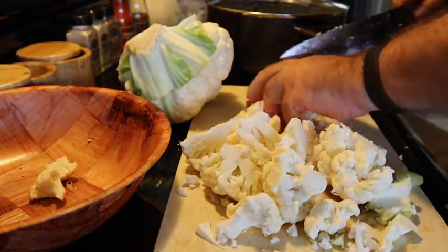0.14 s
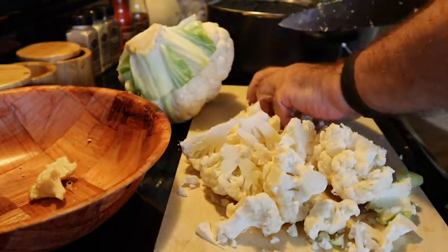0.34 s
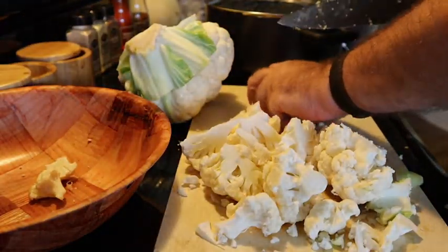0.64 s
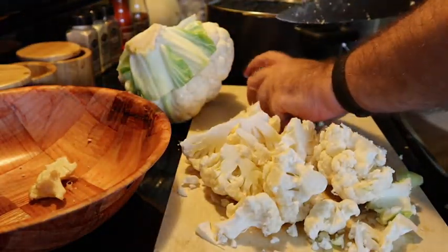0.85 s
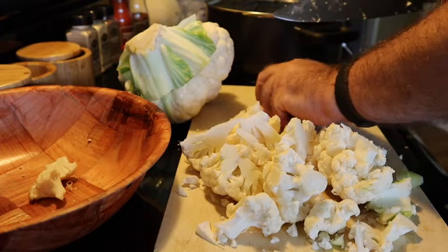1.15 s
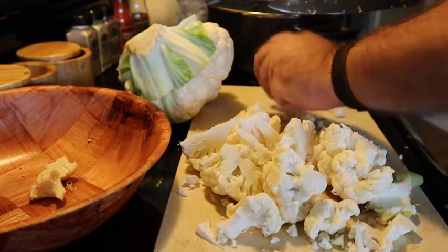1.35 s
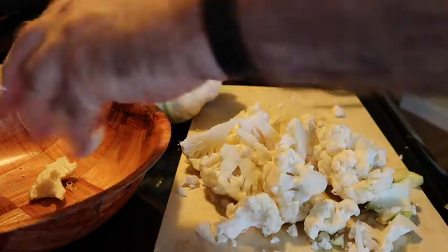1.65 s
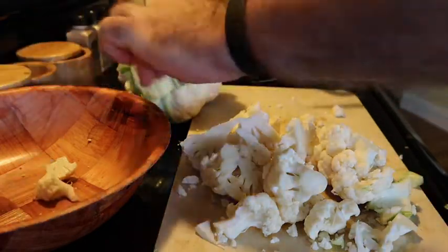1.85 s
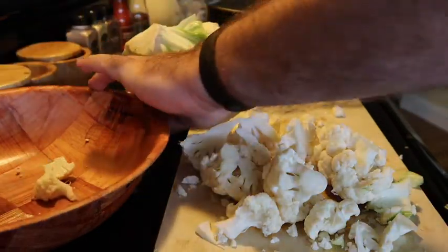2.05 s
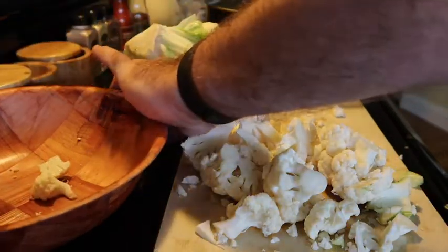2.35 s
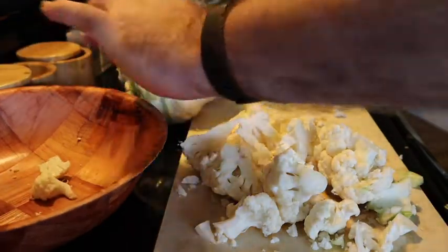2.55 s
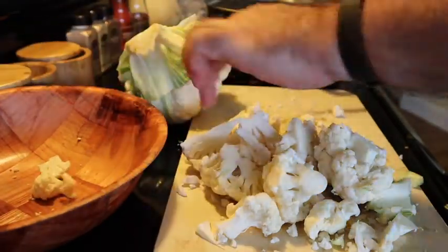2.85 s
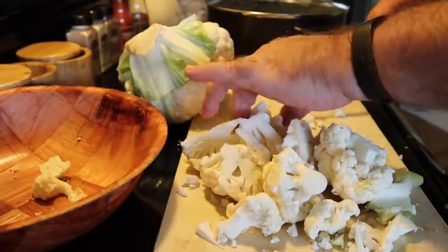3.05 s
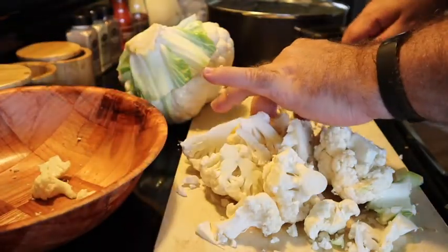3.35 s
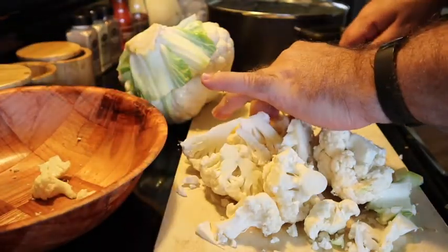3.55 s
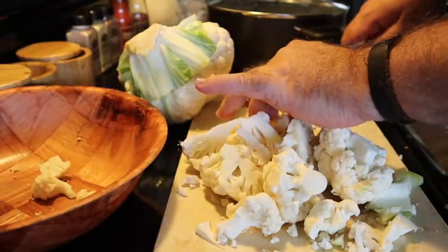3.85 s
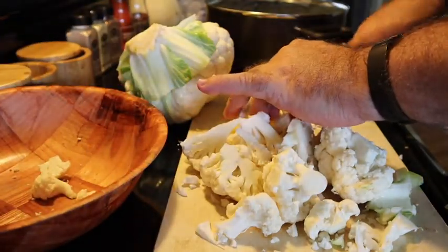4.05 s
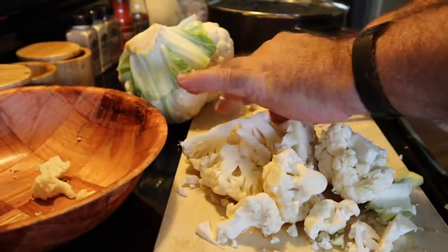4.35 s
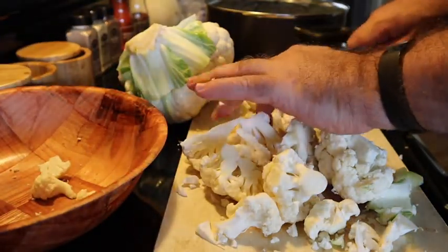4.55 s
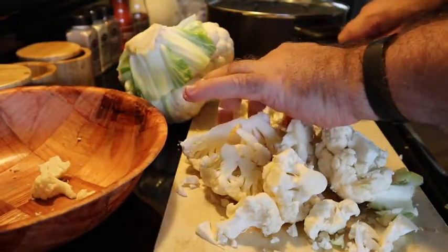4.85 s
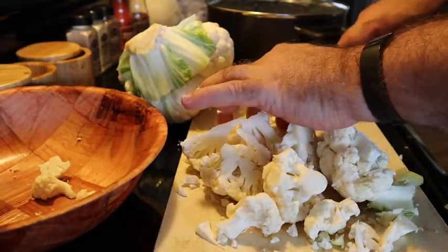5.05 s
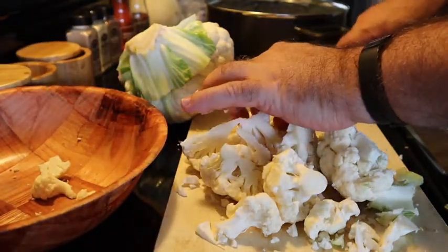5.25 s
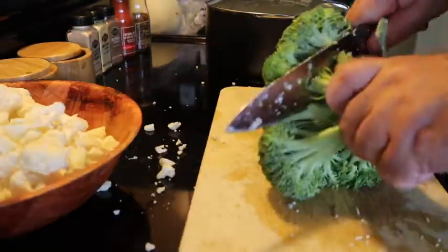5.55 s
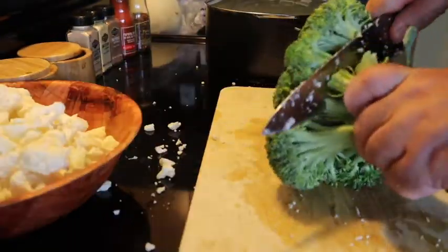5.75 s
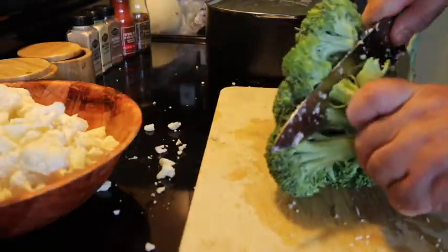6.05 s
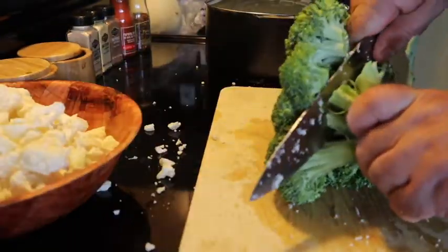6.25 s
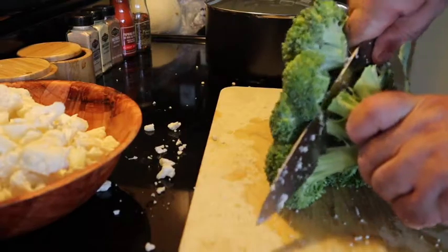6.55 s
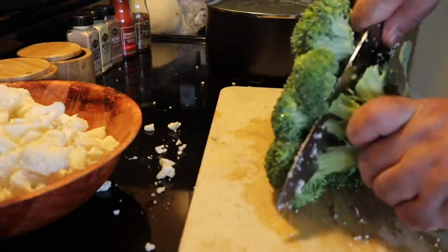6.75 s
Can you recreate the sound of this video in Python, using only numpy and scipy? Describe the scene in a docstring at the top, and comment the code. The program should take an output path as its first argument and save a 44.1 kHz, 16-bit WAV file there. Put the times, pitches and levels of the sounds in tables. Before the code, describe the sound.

Vegetable pieces rustle and bounce into a wooden bowl, a knife chops once loudly, then crunches through broccoli over a faint hum.

```python
"""An appliance hums in a kitchen while vegetables rustle and tap on a cutting board close by.
A cauliflower floret bounces in a wooden bowl, each impact exciting the damped modes of the wood.
A stalk fractures and the knife strikes the board with a loud crack. Then the blade crunches through
broccoli, whose bursting cells and snapping fibres radiate trains of tiny pulses. The small room
reverberates briefly."""
import sys
import numpy as np
from scipy import signal
from scipy.fft import rfft, irfft, next_fast_len
from scipy.io import wavfile
from scipy.ndimage import uniform_filter1d, map_coordinates

SR = 44100
rng = np.random.default_rng(int(sys.argv[2]) if len(sys.argv) > 2 else 0)


def put_to_file(sound):
    """Save the sound as 16-bit audio at rate SR, in the file named by the first command-line argument."""
    columns = np.atleast_2d(sound).T  # one column per channel
    safe = np.clip(columns, -1, 1)
    whole_steps = np.round(safe * 32767)
    wavfile.write(sys.argv[1], SR, whole_steps.astype(np.int16))


N = 303849
HIT_TIME = np.arange(SR // 4) / SR  # time after a contact [s]

# the floret's bounces: (time [s], relative knock level [dB], relative slap level [dB], pitch [Hz])
BOUNCES = [(1.799, -29, -27.5, 837), (1.8194, -29.5, -18, 823), (1.830, -32, -33.5, 775),
           (1.8575, -33.5, -32.5, 564), (1.924, -46.5, -32, 790), (1.9695, -31, -35.5, 745),
           (2.021, -56, -45.5, 557), (2.1668, -40, -40.5, 610)]
# spectra, each (frequency [Hz], relative density [dB])
THUMP_SPECTRUM = [(80, -28), (190, -11), (290, 1), (430, 0), (650, -1.5), (1000, -14.5), (2000, -38.5)]  # wood shifting on the counter
RUB_SPECTRUM = [(150, -20), (300, -1), (900, -1), (1700, 0), (2400, -3), (3400, -2), (5500, -4),
                (8000, -13), (12500, -16), (16000, -29.5)]  # vegetables rubbing
CRUNCH_SPECTRUM = [(350, -42.5), (600, -11.5), (688, -13), (1450, -8), (2070, -9.5), (3120, -2),
                   (3680, -7.5), (4650, -1), (8500, -10.5), (12000, -10), (14500, -15.5), (16000, -23.5)]  # cells bursting


def amp(db):
    """Amplitude ratio of a level in decibels."""
    return 10 ** (np.asarray(db) / 20)


def unit(x):
    """Normalisation to rms 1."""
    return x / np.sqrt(np.mean(x ** 2) + 1e-20)


def unit_hit(x):
    """Normalisation of a transient to the energy of 4 ms at rms 1."""
    return x * np.sqrt(.004 * SR / np.sum(x ** 2))


def along(points, hz):
    """Interpolation of (frequency [Hz], value) points on a logarithmic frequency axis."""
    frequencies, values = np.transpose(points)
    return np.interp(np.log(hz + 1), np.log(frequencies + 1), values)


def fade(t, t60):
    """Exponential decay, 60 dB down after t60 seconds."""
    return np.exp(-np.log(1000) * t / t60)


def add(track, s, x):
    """Superposition of x on the track from time s."""
    part = track[max(0, round(s * SR)):][:len(x)]
    part += x[:len(part)]


def wobble(rate):
    """Smooth random modulation: a spline through `rate` knots a second."""
    knots = rng.standard_normal(int(N * rate / SR) + 4)
    return map_coordinates(knots, [np.arange(N) * rate / SR])


def coloured(x, spectrum):
    """Minimum-phase filtering: folding the cepstrum gives the spectrum a causal response."""
    m = 2 * next_fast_len(len(x) // 2 + 4096)
    gain = amp(along(spectrum, np.fft.rfftfreq(m, 1 / SR)))
    cepstrum = irfft(np.log(gain), m)
    cepstrum[1:m // 2] *= 2
    cepstrum[m // 2 + 1:] = 0
    return irfft(rfft(x, m) * np.exp(rfft(cepstrum)), m)[:len(x)]


def burst(spectrum, t60, scatter_db):
    """Impact noise: an impulse followed by a decaying scatter of tiny contacts."""
    impulse = unit_hit(1.0 * (HIT_TIME == 0))
    scatter = unit_hit(rng.standard_normal(len(HIT_TIME)) * fade(HIT_TIME, t60))
    return unit_hit(coloured(impulse + amp(scatter_db) * scatter, spectrum))


def ring(modes, vary_db=1.5):
    """Modal radiation: sound follows the velocity of damped modes, excited anew at each strike."""
    displacement = 0
    for hz, db, t60 in modes:
        swing = amp(db + vary_db * rng.standard_normal()) / hz
        displacement += swing * fade(HIT_TIME, t60) * np.sin(2 * np.pi * hz * HIT_TIME)
    onset = 1 - fade(HIT_TIME, .0044)
    return unit_hit(np.diff(displacement * onset, prepend=0))


def cells(n, spectrum, rate, hiss_db, uneven_db, tilt_db):
    """Shot noise: `rate` uneven pops a second over a fine hiss, tilted by tilt_db per octave."""
    occurs = rng.random(N)[:n] < rate / SR
    size = np.minimum(rng.exponential(size=N)[:n], np.pi)
    sign = rng.choice([-1, 1], N)[:n]
    hiss = amp(hiss_db) * rng.standard_normal(N)[:n]
    pops = unit(occurs * sign * amp(uneven_db * size))
    tilted = [(hz, db + tilt_db * np.log2(hz / 1000)) for hz, db in spectrum]
    return unit(coloured(pops + hiss, tilted))


def crackle(strokes, spectrum, rate, hiss_db, uneven_db, tilt_db, swell, crisp=0):
    """Modulated shot noise: each stroke swells and fades; crisp [dB/octave per dB] brightens hard ones."""
    usual_db = -55
    out = np.zeros(N)
    for start, end, db in strokes:
        n = max(int((end - start) * SR), 64)
        grains = cells(n, spectrum, rate, hiss_db, uneven_db, tilt_db + crisp * (db - usual_db))
        add(out, start, amp(db) * unit(np.hanning(n) ** swell) * grains)
    return out


def patchy(x, depth_db):
    """Spectral modulation: each patch of flesh has its own colour, so gain varies in pitch and time."""
    spectra = signal.stft(x, nperseg=256)[2]
    field = uniform_filter1d(rng.standard_normal(spectra.shape), size=6, axis=0)
    field = uniform_filter1d(field, size=4, axis=1)
    return signal.istft(spectra * amp(depth_db * unit(field)), nperseg=256)[1][:N]


def kitchen(x, near_db, tail_db):
    """Reverberation: early reflections from counter and pots, then a diffuse tail, join the sound."""
    decay_times = [(100, .5), (280, .6), (700, .46), (1800, .49), (5000, .46), (8000, .35), (15000, .22)]  # the room: (frequency [Hz], t60 [s])
    # colour of the tail: (frequency [Hz], relative gain [dB])
    tail_spectrum = [(100, 4), (300, 6.5), (800, -1), (2000, -3.5), (5000, -6), (12000, -5.5)]
    hz, t, spectra = signal.stft(rng.standard_normal(SR * 3 // 4), SR, nperseg=256)
    tail = signal.istft(spectra * fade(t, along(decay_times, hz)[:, None]), SR, nperseg=256)[1]
    t = np.arange(len(tail)) / SR
    tail = coloured(tail * (1 - fade(t, .037)), tail_spectrum)
    near = rng.standard_normal(len(t)) * fade(t, .06) * (t > .002)
    response = amp(near_db) * near / np.linalg.norm(near) + amp(tail_db) * tail / np.linalg.norm(tail)
    return x + signal.fftconvolve(x, response)[:N]


def appliance():
    """Tonal and broadband noise: a motor's phase-modulated hum lines over a steady rush of air."""
    air_spectrum = [(20, -11), (50, -13.5), (90, -8), (130, -5), (300, -8), (430, -11.5), (660, -18.5),
                    (1100, -22), (1700, -24.5), (2300, -30.5), (3200, -32.5), (4200, -31), (6000, -34),
                    (16000, -41.5)]  # the rush: (frequency [Hz], relative density [dB])
    hum_lines = [(120, -66, 1), (189, -65.5, 1.7), (233, -72, 9), (327.5, -74, 4.6), (416, -74.5, 4)]  # the motor: (frequency [Hz], level [dB], phase wander [relative])
    lowest_line_gain = [(0, 1.5), (5.3, 1.5), (5.5, -28), (6.89, -4)]  # added to the lowest line: (time [s], gain [dB])
    t = np.arange(N) / SR
    lines = [amp(db) * unit(np.sin(2 * np.pi * hz * t + .088 * wander * wobble(4.5)))
             for hz, db, wander in hum_lines]
    lines[0] *= amp(np.interp(t, *np.transpose(lowest_line_gain)))
    rush = unit(coloured(rng.standard_normal(N), air_spectrum)) * amp(-60.5 + .5 * wobble(9))
    return rush + sum(lines)


def rubbing():
    """Friction and fracture noise: handled florets rustle; the bouncing one skids and crumbles."""
    # strokes, each (start [s], end [s], level [dB])
    rubs = [(.16, .44, -68.5), (.35, .42, -64), (.448, .53, -58.5), (.62, .73, -64), (1.092, 1.135, -63),
            (2.0, 2.6, -66), (2.11, 2.19, -60.5), (2.235, 2.335, -59.5), (2.42, 2.46, -57),
            (3.13, 3.21, -69), (6.83, 6.92, -58)]  # fingers and vegetables slide over each other and the board
    breaking_buds = [(1.812, 1.834, -37)]  # at the hardest landing
    skids = [(s, s + .06, slap_db - 27) for s, _, slap_db, _ in BOUNCES]
    fingers = crackle(rubs, RUB_SPECTRUM, rate=1200, hiss_db=-1, uneven_db=4, tilt_db=-.5, swell=.49)
    skid = crackle(skids, RUB_SPECTRUM, rate=900, hiss_db=-3, uneven_db=4, tilt_db=-2.5, swell=.3)
    crumble = crackle(breaking_buds, RUB_SPECTRUM, rate=2500, hiss_db=-3, uneven_db=3,
                      tilt_db=2.5, swell=.6)
    return patchy(fingers + skid + crumble, depth_db=1.5)


def taps():
    """Light impacts: pieces knock on the board, which resonates faintly and thuds on the counter."""
    knocks = [(0.499, -49), (1.0135, -51.5), (2.817, -30.5), (2.923, -41), (3.0335, -52.5), (3.0725, -59),
              (6.648, -49), (6.748, -49), (6.875, -53.5)]  # contacts: (time [s], relative level [dB])
    knock_spectrum = [(80, -52), (200, 2.5), (560, 9), (900, 5.5), (1500, -1.5), (1950, -3.5), (2700, 1),
                      (3500, -6.5), (4700, -5), (7000, -20), (15000, -38.5)]  # contact noise: (frequency [Hz], relative density [dB])
    board_modes = [(548, 2, 0.072), (610, -1, 0.043), (1350, -9.5, 0.089), (1920, 1.5, 0.027)]  # lightly struck: (frequency [Hz], relative level [dB], t60 [s])
    out = np.zeros(N)
    for s, db in knocks:
        add(out, s, amp(db + 1) * burst(knock_spectrum, t60=.028, scatter_db=10.5))
        add(out, s, amp(db - 7) * ring(board_modes))
        add(out, s, amp(db - 14) * burst(THUMP_SPECTRUM, t60=.12, scatter_db=10))
    return out


def bowl():
    """Impact excitation: a moist floret knocks, thumps and slaps in the bowl; a hand rings the rim."""
    bowl_modes = [(.31, -10.5, .05), (.5, -15, 0.042), (.72, -5, .025), (1, 11, 0.021), (1.2, -14.5, 0.014)]  # softly struck: (ratio to the pitch, relative level [dB], t60 [s])
    slap_spectrum = [(200, -23.5), (1000, -15), (1500, -13), (2400, 0.5), (3300, 1), (5500, -6),
                     (8000, -18.5), (13000, -35.5), (16000, -37.5)]  # wet contact: (frequency [Hz], relative density [dB])
    rim_touches = [(2.1517, -41), (2.2526, -49.5), (2.3019, -33)]  # the hand brushes the rim: (time [s], level [dB])
    rim_modes = [(416, -4, 0.037), (758, 2.5, 0.04), (1105, 1, 0.034), (1442, -9.5, 0.058)]  # its resonances: (frequency [Hz], relative level [dB], t60 [s])
    out = np.zeros(N)
    for s, knock_db, slap_db, hz in BOUNCES:
        wood = ring([(hz * ratio, db, t60) for ratio, db, t60 in bowl_modes])
        add(out, s, amp(knock_db + 7) * wood)
        add(out, s, amp(knock_db - 4) * burst(THUMP_SPECTRUM, t60=.18, scatter_db=17.5))
        add(out, s, amp(slap_db - .5) * burst(slap_spectrum, t60=.052, scatter_db=1.5))
    for s, db in rim_touches:
        add(out, s, amp(db) * ring(rim_modes, vary_db=3))
    return out


def cutting():
    """Cell rupture: broccoli under the knife emits a thin crackle that thickens with every push."""
    # strokes, each (start [s], end [s], level [dB])
    pushes = [(5.235, 5.275, -66), (5.278, 5.335, -59.5), (5.393, 5.465, -51), (5.555, 5.675, -56.5),
              (5.745, 5.84, -50.5), (5.888, 6.01, -59.5), (6.08, 6.165, -59.5), (6.19, 6.315, -53),
              (6.408, 6.49, -57), (6.5, 6.68, -59), (6.742, 6.785, -54.5)]  # the knife advances
    pressure = [(5.33, 6.92, -66)]  # between pushes the blade still presses on the flesh
    pushing = crackle(pushes, CRUNCH_SPECTRUM, rate=750, hiss_db=-3.5, uneven_db=4.3,
                      tilt_db=-.4, swell=.35, crisp=.08)
    leaning = crackle(pressure, CRUNCH_SPECTRUM, rate=400, hiss_db=-3, uneven_db=5,
                      tilt_db=-1.2, swell=.15)
    return patchy(pushing + leaning, depth_db=3) * amp(wobble(70))


def tear():
    """Successive failure of a fibre bundle: rows for snaps(), unevenly spaced and growing louder."""
    start_s, end_s, gap_s = 6.222, 6.304, .0095
    times = np.arange(start_s, end_s, gap_s)
    late, louder = rng.standard_normal((64, 2))[:len(times)].T
    levels = np.linspace(-47, -39, len(times)) + 1.5 * louder
    return [(s, click_db, -59) for s, click_db in zip(times + .08 * gap_s * late, levels)]


def snaps():
    """Brittle fracture: single fibres break with bright clicks, and thick ones add a lower crack."""
    # fibres break: (time [s], relative click level [dB], relative crack level [dB])
    breaks = [(1.0135, -54, -60), (1.095, -58, -56), (3.504, -56.5, -78), (5.7475, -47.5, -68),
              (5.781, -42.5, -50), (5.8445, -52, -51), (5.8945, -49, -62), (5.9025, -32.5, -47),
              (5.9232, -37.5, -48), (6.1348, -45, -55), (6.1848, -36, -48), (6.3533, -54, -52),
              (6.409, -43, -53), (6.5473, -38, -47), (6.6183, -23, -29), (6.6355, -33, -47.5)]
    click_spectrum = [(300, -18), (1200, -26.5), (2200, -14), (3000, -1.5), (4400, 0), (5600, 3),
                      (8500, -5), (13000, -4.5), (16000, -17.5)]  # any fibre: (frequency [Hz], relative density [dB])
    crack_spectrum = [(100, -55), (900, -9), (1350, -4.5), (2000, 0.5), (2700, -4.5), (8000, -35.5)]  # a thick fibre: (frequency [Hz], relative density [dB])
    out = np.zeros(N)
    for s, click_db, crack_db in breaks + tear():
        add(out, s, amp(click_db - 1.5) * burst(click_spectrum, t60=.0104, scatter_db=3))
        add(out, s, amp(crack_db - 1) * burst(crack_spectrum, t60=.012, scatter_db=-12))
    return out


def split(chop_s):
    """Crack growth: the stalk splits ahead of the blade; a crunch and a dull groan swell into the chop."""
    length_s, growth_db = .068, 19
    out, n = np.zeros(N), int(length_s * SR)
    to_go = np.linspace(1, 0, n)
    crunch = cells(n, CRUNCH_SPECTRUM, rate=2000, hiss_db=-3, uneven_db=3, tilt_db=-.3)
    crunch *= amp(-growth_db * to_go + 2 * wobble(90)[:n])
    groan = cells(n, RUB_SPECTRUM, rate=1200, hiss_db=-1, uneven_db=2.5, tilt_db=-5)
    groan *= amp(-12 - 20 * to_go)
    add(out, chop_s - length_s, amp(-35.5) * (crunch + groan))
    return out


def chop(chop_s):
    """Hard impact: the blade meets the board with a briefly ringing crack, and the board rocks."""
    blow_spectrum = [(40, -53), (100, -31), (250, -13), (450, -10.5), (700, -7), (1250, 2), (2000, 1),
                     (2450, -2.5), (2900, -3.5), (3900, -11.5), (5100, -9), (6200, -9.5), (7300, -23.5),
                     (10000, -35), (16000, -42)]  # the blade's blow: (frequency [Hz], relative density [dB])
    # short ringing peaks that colour the crack: (frequency [Hz], base bandwidth [Hz], relative level [dB])
    peaks = [(323, 70, -4.5), (850, 77, 6.5), (1123, 23, -3.5), (1240, 15, -4.5), (1790, 27, 1),
             (2090, 37, -8.5), (2260, 20, -6), (3000, 35, -5.5), (4330, 97, -11.5), (4810, 27, -7.5),
             (5410, 23, -14.5), (5650, 55, -18.5)]
    thuds = [(4.156, -27), (4.477, -48)]  # the board rocks on the counter: (time [s], relative level [dB])
    # modes of that rocking: (frequency [Hz], relative level [dB], t60 [s])
    rocking_modes = [(135, -8, .076), (283, -.5, .08), (338.6, -4.5, .08), (552, -7, .1)]
    extra_width_hz = 45  # a wider peak dies sooner
    short_rings = [(hz, db, np.log(1000) / (np.pi * (width + extra_width_hz))) for hz, width, db in peaks]
    out = np.zeros(N)
    add(out, chop_s, amp(-2) * burst(blow_spectrum, t60=.03, scatter_db=-3.5))
    add(out, chop_s, amp(-17.5) * ring(short_rings))
    for s, db in thuds:
        add(out, s, amp(db + 3.5) * ring(rocking_modes))
    return out


def scene():
    """Superposition: all sources add at one microphone, heard alike in both ears."""
    chop_s, dip_s, dip_width_s = 4.153, .838, .005
    mono = (kitchen(bowl(), near_db=-10, tail_db=-18.5)
            + kitchen(taps() + rubbing(), near_db=-10.5, tail_db=-19.5)
            + kitchen(chop(chop_s), near_db=-17, tail_db=-17)
            + kitchen(split(chop_s) + cutting() + snaps(), near_db=-8.5, tail_db=-18)
            + appliance())
    dip = 1 - np.exp(-((np.arange(N) / SR - dip_s) / dip_width_s) ** 2)  # the level dips briefly
    return np.array([mono, mono]) * dip


def record(dry):
    """Clipping and band limiting: peaks stop at full scale; deep bass and top treble are filtered out."""
    bass_hz, top_hz, edge_hz = 75, 16100, 600
    m = next_fast_len(N + 8192)
    clipped = np.clip(dry, -1, 1)
    thinned = signal.sosfilt(signal.butter(2, bass_hz, "highpass", fs=SR, output="sos"), clipped)
    band = np.clip((top_hz - np.fft.rfftfreq(m, 1 / SR)) / edge_hz + .5, 0, 1)
    return irfft(rfft(thinned, m) * band, m)[:, :N]


dry = scene()
out = record(dry)
put_to_file(out)
```